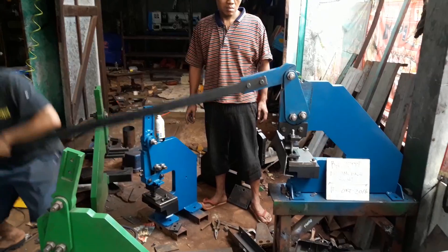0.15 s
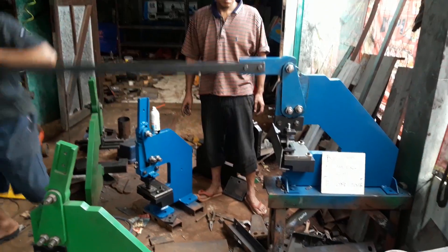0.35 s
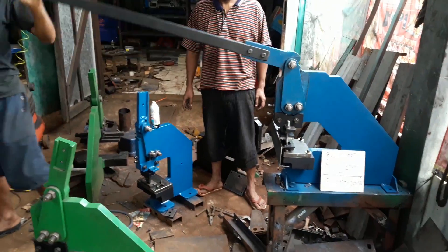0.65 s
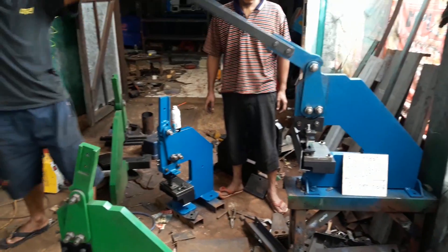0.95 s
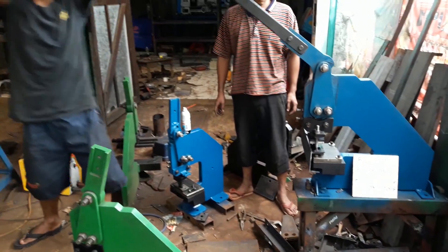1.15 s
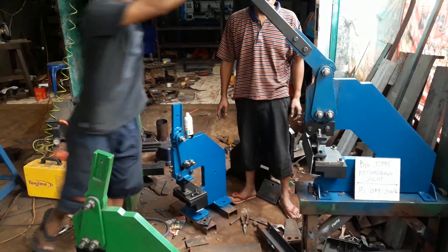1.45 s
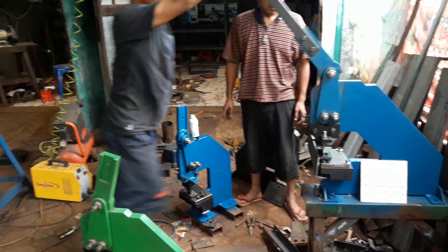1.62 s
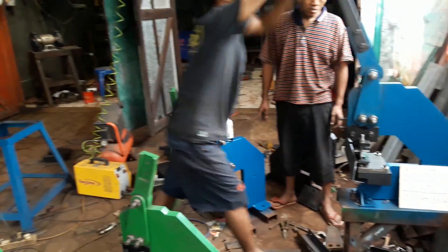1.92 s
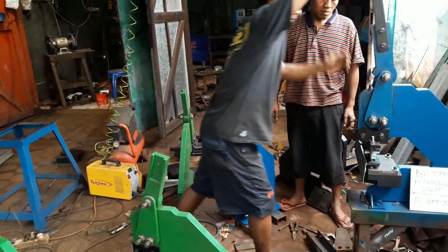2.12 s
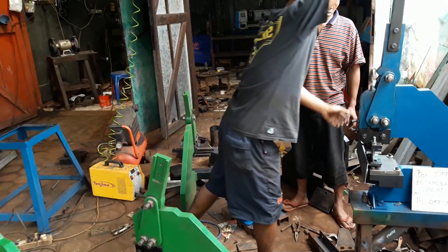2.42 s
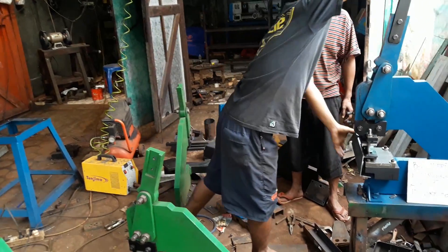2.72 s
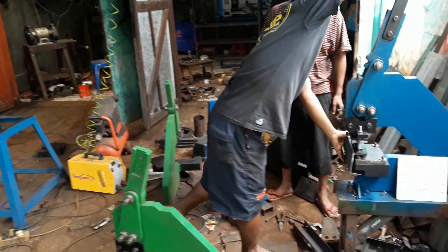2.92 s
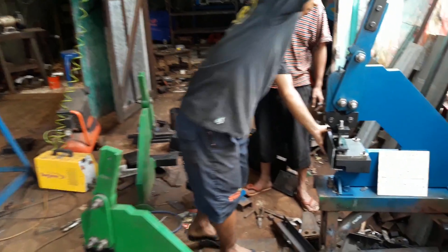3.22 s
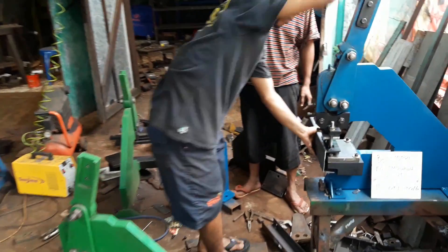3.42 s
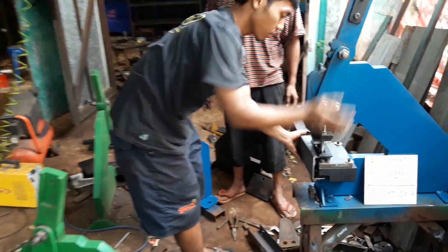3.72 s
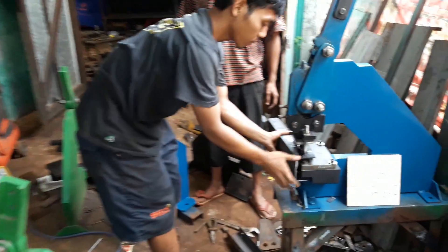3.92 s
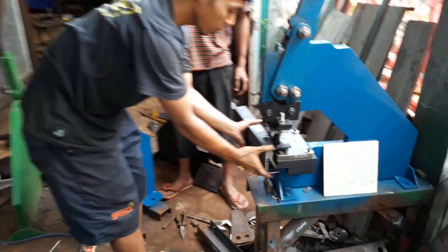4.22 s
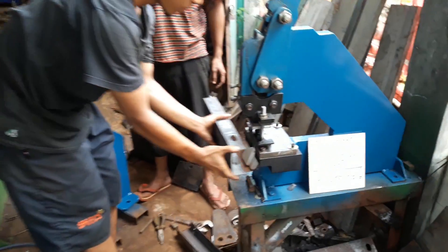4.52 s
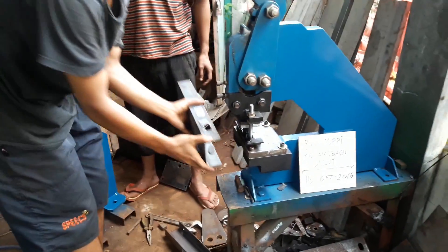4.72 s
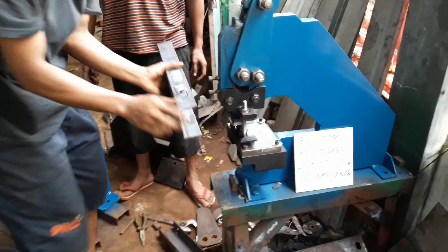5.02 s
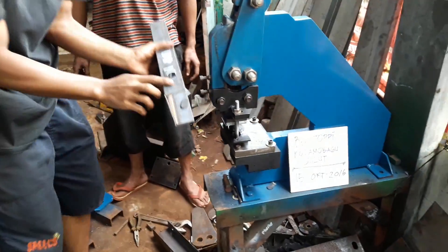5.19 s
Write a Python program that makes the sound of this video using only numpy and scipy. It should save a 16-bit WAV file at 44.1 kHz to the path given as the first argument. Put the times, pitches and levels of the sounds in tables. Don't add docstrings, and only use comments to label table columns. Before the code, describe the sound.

Close to the microphone in an open workshop, a punch press breaks through steel with a very loud, bright bang that rings for about a second. The lever clanks and bounces on its stop, its pin rattling. Sandals scuff grit and cloth rubs, with dull bumps. Later a steel bar rattles and slams free of the die. Small birds peep falling calls over low street rumble.

```python
import sys
import numpy as np
from scipy import signal
from scipy.fft import rfft, irfft
from scipy.io import wavfile
from scipy.ndimage import uniform_filter1d

SR = 44100
rng = np.random.default_rng(int(sys.argv[2]) if len(sys.argv) > 2 else 0)


def level_to_linear(level):
    exponent = np.asarray(level, float) / 20
    return 10 ** exponent


def digitize_waveform(pressure):
    field = np.atleast_2d(pressure).T
    bounded = np.clip(field, -1, 1)
    quanta = np.round(bounded * 32767).astype(np.int16)
    wavfile.write(sys.argv[1], SR, quanta)


N = 235960

# start in seconds, peak in dB.
PUNCH = [
    (.0556, -26),
    (.0603, -7),
    (.222, -35),
]
CASTING_HZ = [581, 722, 820, 1048, 1244, 1550, 1852, 2085, 2250, 2411, 2530, 2827, 2912, 3010, 3124, 3270,
              3417, 3598, 3795, 3973, 4150, 4357, 5130, 5475, 6464, 6524, 6867, 7209, 7530, 7768, 8839,
              9162, 10060, 10860, 11650, 13180, 15020]
# level in dB, t60 in seconds, rise in seconds, beats per second,
# split neighbour in dB.
CASTING = [(-27, 0.6, 0.095, 2.2, -3.5), (-24, 0.35, 0.057, 5.2, -6), (-33.5, .2, .02, 25, -4.5),
           (-33.5, 0.55, 0.002, 14, -6), (-40, 0.18, 0.0013, 16, 7), (-37.5, 1, 0.015, 12, 3),
           (-33.5, 0.9, .002, 7.7, -7.5), (-35, 1, 0.0022, 18, -3.5), (-31.5, 0.25, 0.0022, 12, -15),
           (-16, 0.27, 0.0021, 2.6, -9.5), (-43.5, 0.28, .002, 13, -12.5), (-12.5, 0.42, 0.027, 4.4, -23),
           (-23, 0.62, 0.0039, 38, -12), (-16, 0.4, 0.023, 11.2, -2), (-19, 0.57, 0.0018, 6.2, -8),
           (-27, .3, .002, 27, -9.5), (-19.5, 0.41, .004, 7.9, -1.5), (-24.5, 0.72, 0.0048, 5, -2.5),
           (-29, 0.87, .03, 9, -17.5), (-22, 0.65, 0.06, 7.8, -13.5), (-23.5, 0.116, 0.0019, 9, -14.5),
           (-33.5, 0.24, .004, 9, -21), (-43, 0.2, 0.012, 4, -24), (-9.5, 0.45, 0.06, 1.2, -2.5),
           (-19, 0.52, 0.0022, 51, 0), (-8.5, 0.28, 0.069, 11.8, -0.5), (-26, 0.42, 0.027, 9, -19.5),
           (-19.5, 0.34, 0.017, 4, -17), (-11.5, 0.26, 0.04, 25, 2), (-29.5, 0.45, 0.0081, 7, -12),
           (-31.5, 0.27, .01, 7, -12), (-35.5, 0.4, .02, 9, -11.5), (-28.5, 0.24, .003, 11, -6.5),
           (-28, 0.27, 0.0042, 9, 5), (-31, .22, .005, 25, -7.5), (-26.5, .25, 0.012, 19, -9.5),
           (-23.5, .22, .012, 33, -15)]
# mode in Hz, level in dB, t60 in seconds.
SHEEN = [(8495, -8, .23), (9750, -12.5, .2), (8900, -6, .21), (9360, -16.5, .14), (9580, -14, 0.28),
         (10000, -10.5, .2), (10860, -4.5, 0.35), (11420, -3.5, 0.095), (12130, -9, .18), (12700, -9.5, .2),
         (13370, -1, .25), (14080, -11, .25), (14500, -8, .15), (15700, 0, .15)]
# frequency in Hz, level in dB per Hz.
CRACK = [(300, -64.5), (600, -14), (1500, -17.5), (2200, -6.5), (3300, -0.5), (4500, -7.5), (7000, -6),
         (8200, -13.5), (13000, -16.5), (16500, -14.5)]
# frequency in Hz, level in dB per Hz.
HAZE_TOP = [(12000, -24)]
# frequency in Hz, level in dB per Hz.
CLANK = [(70, -62), (250, -8), (400, 4.5), (1200, 2), (2000, -2), (3300, -2), (5000, -20), (7600, -46),
         (8400, -20), (15000, -66)]
# start in seconds, peak in dB.
BUMPS = [(2.957, -33), (3.447, -33), (3.468, -38.5), (4.795, -50), (4.822, -43)]

# start in seconds, peak in dB, brightness in dB per octave.
LEVER_KNOCKS = [
    (1.209, -37.5, 5.5),
    (1.2545, -16.5, -2.5),
    (1.2615, -20, -3.5),
    (1.275, -25, -1),
]
# mode in Hz, level in dB, t60 in seconds.
LEVER = [(369, -11, 0.083), (476, 0, 0.038), (572, -8, 0.072), (987, -3.5, 0.13), (1157, -3.5, 0.13),
         (1400, -4, 0.11), (1550, -5.5, 0.17), (1792, -6, 0.16), (2250, -4, 0.073), (2465, 2, 0.071),
         (2710, -2.5, 0.1), (2880, -6, 0.2), (3090, -2.5, 0.25), (3503, -6, 0.25), (3740, -1, 0.18),
         (4336, 0.5, 0.07), (4830, -16, .15), (7400, -16, 0.13)]
# start in seconds, peak in dB, brightness in dB per octave.
PIN_KNOCKS = [(1.311, -21, 1.5), (1.328, -26.5, -4), (1.419, -29, -1.5), (1.49, -38.5, -3.5)]
# mode in Hz, level in dB, t60 in seconds.
PIN = [(472, -9.5, 0.14), (607, -9.5, 0.17), (1023, -11, .12), (1160, -25, 0.061), (1437, -3, 0.12),
       (1543, -1, 0.13), (1806, -17, .15), (2470, -3.5, 0.14), (2940, -9.5, 0.51), (2990, -23, 0.37),
       (3000, -21, .15), (3400, -5, 0.24), (3510, -5, 0.26), (4130, -11.5, 0.27), (4250, -14, 0.13),
       (4430, -12, 0.1), (4740, -20, 0.46), (5900, -23, 0.28), (7133, -21, 0.25), (7600, -20, .15)]

# start in seconds, peak in dB.
NUDGES = [(3.543, -51), (3.573, -38), (3.592, -41), (3.603, -49), (3.6166, -34), (3.634, -32.5),
          (3.648, -37), (3.672, -50), (3.757, -54.5), (3.79, -42.5)]
# mode in Hz, level in dB, t60 in seconds.
HELD_BAR = [(960, -7, 0.09), (1538, -4, 0.18), (2003, -6, 0.14), (2330, -15, 0.13), (2600, -17, 0.17),
            (3030, -8.5, 0.13), (3360, -20, .1), (3930, -19, 0.13), (4420, -23, 0.2), (4540, -17.5, 0.12),
            (5900, -24, 0.18), (6530, -18, 0.13), (7560, -23, 0.099), (8800, -31, .15)]
# start in seconds, peak in dB, brightness in dB per octave.
RATTLE = [(4.2103, -42, -4), (4.2173, -35.5, 3), (4.2302, -42, -9), (4.2352, -32.5, 1.5),
          (4.2407, -32.5, -1), (4.2726, -29.5, 1), (4.2776, -32.5, 7.5), (4.293, -27.5, 1),
          (4.316, -36, -6), (4.3205, -22, -0.5), (4.347, -22.5, 3.5), (4.389, -42, -7)]
# mode in Hz, level in dB, t60 in seconds.
FREE_BAR = [(981, -6.5, 0.18), (1532, -4, 0.42), (1914, -9, 0.34), (2306, -18, 0.18), (2605, -19, 0.51),
            (2830, -19.5, 0.85), (2990, -20, 0.86), (3390, -17.5, 0.24), (3980, -15, 0.15),
            (4400, -22, 0.16), (4600, -21.5, 0.27), (4900, -39, .3), (5620, -34, .1), (5800, -30, 0.32),
            (6550, -32, 0.15), (6800, -39, 0.33), (7160, -31, 0.3), (8400, -41, 0.24), (9930, -46, 0.2),
            (11420, -42, 0.23), (12390, -48, 0.2)]

# start in seconds, peak in dB, centre in Hz.
THUDS = [(.035, -43, 260), (.222, -35, 192), (1.095, -42.5, 494), (2.89, -41, 359), (2.957, -27, 435),
         (3.15, -37, 354), (3.447, -38.5, 400), (.55, -37.5, 484), (2.03, -31.5, 990), (3.62, -38, 556)]
# start in seconds, peak in dB, pitch in Hz.
TINKS = [(2.497, -60, 2850), (3.147, -54, 4600), (3.643, -53, 6530), (3.787, -59.5, 4350),
         (4.272, -51, 5600)]
# start in seconds, peak in dB, centre in Hz.
SNAPS = [(3.731, -56, 10430), (4.795, -38, 1900), (4.822, -34, 2270), (4.85, -37, 2340),
         (4.872, -29.5, 2300)]
TICKS = [.264, 2.814, 2.974, 3.036, 3.095, 3.155, 3.296, 3.395, 3.535, 3.854, 3.915, 3.975, 4.135, 4.435]
# start in seconds, peak in dB, brightness in dB per octave.
CREAKS = [(.566, -50.5, 9.5), (.575, -46, 2), (.698, -54, 5), (.755, -41, 1.5), (3.92, -48, -1.5),
          (2.66, -59, -8)]
# mode in Hz, level in dB, t60 in seconds.
CASE = [(289, -5.5, 0.033), (3450, 10, 0.0016), (5640, -4.5, 0.0061), (7480, -1.5, 0.0043),
        (12600, -9, 0.0045), (15800, -15, 0.0052)]

# peak time in seconds, swell in seconds, fade in seconds, grit in dB, dull drag
# over grit in dB.
SCUFFS = [(.6, 0.18, 0.4, -56.5, -6.5), (1.27, 0.028, 0.061, -45, 8.5), (1.335, 0.047, 0.2, -53.5, 5.5),
          (1.68, 0.092, 0.15, -58.5, -3), (2.011, 0.033, 0.071, -41.5, -5), (2.2, 0.19, 0.45, -69.5, -4.5),
          (2.8, 0.083, 0.4, -66.5, -24.5), (3.12, 0.19, 0.18, -79, 21.5), (3.441, 0.12, 0.24, -66, -16),
          (3.635, 0.067, 0.087, -64.5, 13.5), (4.34, 0.1, 0.11, -57, -5), (4.74, 0.02, 0.034, -61, -16),
          (4.852, 0.033, 0.0434, -36, -3.5), (4.94, 0.028, 0.061, -51.5, -4.5), (5.35, 0.054, .1, -63, -20)]
# peak time in seconds, swell in seconds, fade in seconds, level in dB.
RUSTLES = [(.63, 0.084, 0.085, -60), (1.015, 0.033, 0.026, -65), (1.25, 0.051, 0.026, -63),
           (1.33, 0.028, 0.081, -64.5), (1.67, 0.066, 0.11, -60.5), (2.012, 0.032, 0.041, -48),
           (2.25, 0.24, 0.33, -77.5), (2.85, 0.13, 0.13, -74.5), (3.44, 0.23, 0.061, -67.5),
           (3.62, 0.095, 0.11, -69), (4.33, 0.15, 0.093, -66.5), (4.74, 0.018, 0.044, -67),
           (4.854, .035, 0.055, -59.5), (4.94, .03, 0.045, -63), (5.35, 0.034, .1, -74.5)]
# cloth, grit and drag in dB.
STIR_DB = (-78.5, -75.5, -61.5)
# frequency in Hz, level in dB per Hz.
CLOTH = [(6500, -34), (8300, -3), (9700, -0.5), (13000, -3.5), (15800, -6.5)]
GRIT = [(1500, -11.5), (3000, 0), (4300, 0), (7500, 0), (8300, -17)]
DRAG = [(90, -58.5), (280, -25.5), (600, 3.5), (1000, 9), (2000, 9), (3200, 0), (6000, -33)]

# start in seconds, sag in seconds, drop in seconds, pitch before the break in Hz,
# level in dB.
PEEPS = [(0.5, 0.15, 0.12, 3750, -60.5), (1.001, 0.12, 0.082, 3540, -60), (1.593, 0.13, 0.074, 3480, -59.5),
         (2.123, 0.068, 0.073, 3515, -56), (2.59, 0.093, 0.083, 3530, -57),
         (3.031, 0.13, 0.073, 3530, -58.5), (3.518, .097, .078, 3670, -51.5),
         (3.965, 0.12, 0.068, 3650, -56.5), (4.496, 0.14, 0.071, 3740, -58.5),
         (4.986, 0.13, 0.037, 3600, -61)]
# note in dB, octave in dB.
PEEP_DROPS = [(7, 6), (8, 9), (8, 5), (3, 10), (3, 4), (4.5, 5), (2.5, 1), (7, -2), (6, -7), (2, -15)]
# start in seconds, hold in seconds, plunge in seconds, pitch at the end of the hold
# in Hz, level in dB.
CHEEPS = [(3.882, 0.037, 0.0089, 3630, -59.5), (3.933, 0.23, 0.087, 3173, -56.5),
          (4.324, 0.033, 0.071, 3860, -49), (4.895, 0.0562, 0.0133, 3760, -50),
          (4.976, 0.1, 0.02, 3270, -52.5)]
# time in seconds,
# pitch in Hz, level in dB.
FULL_CHEEPS = [
    [(.29, 3400, -53), (.322, 3225, -39.5), (.345, 2960, -40.5), (.352, 2520, -44.5), (.368, 2250, -46)],
    [(.645, 4400, -61), (.663, 4605, -49.5), (.793, 4430, -49), (.823, 4290, -51), (.829, 4011, -37),
     (.842, 3970, -42.5), (.87, 3730, -45), (.878, 3500, -42)],
    [(.878, 2990, -48), (.89, 2830, -54), (.908, 2375, -53)],
    [(1.155, 4420, -55), (1.19, 4180, -53), (1.225, 4030, -47), (1.255, 3930, -48), (1.3, 3300, -49)],
    [(1.69, 4090, -55), (1.71, 4180, -56), (1.76, 4070, -50), (1.8, 4010, -39), (1.826, 3850, -43),
     (1.838, 3530, -42), (1.88, 3050, -41.5), (1.892, 2820, -48.5), (1.908, 2130, -41)],
    [(2.655, 3920, -54), (2.696, 3850, -52), (2.73, 3730, -49.5), (2.745, 3500, -54), (2.76, 3160, -48),
     (2.776, 3045, -47), (2.8, 2690, -57)],
    [(4.0, 6480, -71.5), (4.05, 6600, -76), (4.125, 6500, -75), (4.18, 6000, -69)],
    [(5.23, 3940, -66), (5.246, 4090, -56.5), (5.29, 4090, -52.5), (5.322, 3832, -52), (5.33, 3450, -48),
     (5.349, 3350, -55)],
]
# pitch in Hz, octave over the note in dB.
OCTAVE = [(2450, -6.5), (2900, -18.5), (3250, -23), (3700, -29), (4200, -53)]
# time in seconds, pitch in Hz, level in dB.
HORN = [
    [(2.27, 820.4, -65), (2.32, 806, -56), (2.38, 794.8, -65)],
    [(4.7, 850, -73), (4.708, 834.4, -55), (4.852, 884, -48.5), (4.96, 840, -57)],
]
# frequency in Hz, level in dB per Hz.
STREET = [(15, -35), (25, -59.5), (43, -4.5), (137, 3), (557, -10.5), (1150, -11.5), (1680, -13.5),
          (2390, -24), (3880, -21.5), (4950, -28.5), (6140, -34), (7420, -26.5), (8490, -48),
          (13100, -34.5), (15800, -36.5)]
# time in seconds, level in dB.
STREET_SWELL = [(0, 7), (0.998, 0), (2.2, 1.4), (2.55, -2), (2.85, -0.4), (3.4, 1.4), (4.0, 0.6),
                (4.75, 1.5), (5.35, 1.5)]
# frequency in Hz, t60 in seconds.
SHOP_T60 = [(300, 0.4), (3000, 0.47), (14000, 0.34)]


def casting(s):
    t, out = np.arange(SR) / SR, np.zeros(N)
    starts = rng.uniform(0, 2 * np.pi, len(CASTING))
    for hz, (level_db, t60, rise, beats, twin_db), start in zip(CASTING_HZ, CASTING, starts):
        mode = np.sin(2 * np.pi * hz * t + start)
        twin = level_to_linear(min(twin_db, 0)) * np.sin(2 * np.pi * (hz + beats) * t + start)
        decay = level_to_linear(level_db - 60 * t / min(t60, .75) - 56.5 * t ** 2)
        out[int(s * SR):][:SR] += decay * (1 - np.exp(-t / rise)) * (mode + twin)
    return out


def ringing_press():
    return casting(PUNCH[1][0]) + struck(PUNCH[1:2], SHEEN, -24.0, 0, .35)


def cracking_steel():
    tear = burst(PUNCH[:1], CRACK, -0.5, 0.055)
    snap = burst(PUNCH[1:2], CRACK, -10.5, 0.044)
    haze = burst(PUNCH[1:2], CRACK[:8] + HAZE_TOP, -12, 0.24)
    slug = burst(PUNCH[2:], CLANK, 0, 0.21)
    bumps = burst(BUMPS, CLANK, -14, 0.099)
    return tear + snap + haze + slug + bumps


def clanking_lever():
    out = struck(LEVER_KNOCKS, LEVER, -10.0, 2.2, 0.19)
    out += struck(PIN_KNOCKS, PIN, -9.5, 1.4, 0.5)
    out += burst(LEVER_KNOCKS + PIN_KNOCKS, CLANK, -16.0, 0.13)
    return out * level_to_linear(3.0 * drift(99))


def loose_bar():
    drag = struck(RATTLE[:8], FREE_BAR, -4.5, 2.0, .6)
    drag *= level_to_linear(-14 * ramp(4.318, .004))
    slam = struck(RATTLE[9:10], FREE_BAR, -4, 0, 0.84)
    bounces = struck(RATTLE[10:], FREE_BAR[3:], -5.5, 2.0, 0.82)
    return drag + slam + bounces


def rattling_bar():
    out = loose_bar() + struck(NUDGES, HELD_BAR, -5, 4, 0.12)
    out += burst(RATTLE + NUDGES, CLANK, -15.5, 0.054)
    fingers_db = -13 * ramp(4.425, 0.03)
    return out * level_to_linear(1.24 * drift(69) + fingers_db)


def near_handling():
    ticks = pops([(s, -50, 13000) for s in TICKS], 3.47, 0)
    tap = struck([(1.7194, -19)], CASE, 0, 0, .05, 0)
    creaks = struck(CREAKS, CASE[1:], 0, 3, .05, 0)
    return pops(SNAPS, 25.2, 0) + ticks + tap + creaks


def thuds_and_tinks():
    return pops(THUDS, 16.6, 0) + pops(TINKS, 250, 0)


def scuffs():
    *when, grit_db, weight_db = np.transpose(SCUFFS)
    cloth = strokes(*np.transpose(RUSTLES))
    gains = cloth, strokes(*when, grit_db), strokes(*when, grit_db + weight_db)
    shared, out = drift(120), 0
    for gain, stir_db, colour in zip(gains, STIR_DB, (CLOTH, GRIT, DRAG)):
        grains = rng.standard_normal(N) * level_to_linear(1.6 * shared)
        out = out + (gain + level_to_linear(stir_db)) * coloured(grains, colour)
    return out


def strokes(s, swell_s, fade_s, peak_db):
    t = np.arange(0, N + 64, 64) / SR - s[:, None]
    away = np.abs(t) / np.where(t < 0, swell_s[:, None], fade_s[:, None])
    gain = level_to_linear(peak_db[:, None] - 11.5 * away ** 1.5).sum(axis=0)
    return np.interp(np.arange(N) / 64, np.arange(len(gain)), gain)


def peep(s, sag_s, drop_s, knee_hz, level_db, note_db, octave_db):
    top_hz, break_s = 4300, 0.015
    shelf_s = max(0.68 * drop_s, break_s + .001)
    steps = [0, .2 * sag_s, sag_s, sag_s + break_s, sag_s + shelf_s, sag_s + drop_s]
    hz = [top_hz, top_hz - .35 * (top_hz - knee_hz), knee_hz, 3100, 2850, 2417]
    shape_db = np.array([-8, 0, 0, -11, note_db, note_db - 4])
    shut_db = -18 * (np.arange(6) < 4)
    return with_octave(s + np.array(steps), hz, level_db + shape_db, octave_db + shut_db)


def cheep(s, hold_s, plunge_s, knee_hz, level_db):
    dive_s, attack_s = .08, .012
    after = np.array([-hold_s, min(attack_s - hold_s, -hold_s / 2), 0, min(dive_s, 1.3 * plunge_s), plunge_s])
    fall_hz_per_s = np.where(after < 0, .06 * knee_hz / hold_s, 12000)
    hz = knee_hz - fall_hz_per_s * after
    hz -= 36000 * np.maximum(after - dive_s, 0)
    shape_db = np.array([-12, -6, 0, -1, -10])
    return with_octave(s + hold_s + after, hz, level_db + shape_db, -5)


def with_octave(s, hz, level_db, octave_db=0):
    return np.transpose([s, hz, level_db, level_db + octave_db + at_hz(OCTAVE, hz)])


def two_birds():
    first = whistle([peep(*call, *drop) for call, drop in zip(PEEPS, PEEP_DROPS)], 3.2, wobble=.007)
    second = whistle([cheep(*call) for call in CHEEPS], 3.5, wobble=.007)
    full = whistle([with_octave(*np.transpose(call), -5) for call in FULL_CHEEPS], 2, wobble=.005)
    return first + second + full


def far_horn():
    return whistle(HORN, 2.9, wobble=0.0034)


def street():
    noise = coloured(rng.standard_normal(N), STREET)
    low = signal.sosfilt(signal.butter(2, 300, fs=SR, output="sos"), noise)
    swell_db = np.interp(np.arange(N) / SR, *np.transpose(STREET_SWELL))
    return level_to_linear(-50.5 + swell_db) * (noise + low * (level_to_linear(0.5 * drift(6.0)) - 1))


def workshop(x):
    t, echoes = np.arange(SR) / SR, 0
    edges = np.geomspace(100, 17000, 8)
    for low, high in zip(edges, edges[1:]):
        band_pass = signal.butter(2, [low, high], "band", fs=SR, output="sos")
        band = signal.sosfilt(band_pass, rng.standard_normal(SR))
        echoes = echoes + band * level_to_linear(-60 * t / at_hz(SHOP_T60, np.sqrt(low * high)))
    echoes = echoes * np.clip(t / 0.0056, 0, 1)
    return signal.fftconvolve(x, echoes / np.sqrt(np.sum(echoes ** 2)))[:N]


def struck(hits, modes, trim_db, scatter_db, longest, contact_s=.004):
    hits, out = np.array(hits), np.zeros(N)
    at = (hits[:, 0] * SR).astype(int)
    first, last = at.min(), min(at.max() + SR, N)
    luck = rng.standard_normal((len(hits), len(modes)))
    late = (rng.random(luck.shape) ** 2 * contact_s * SR).astype(int)
    bright = hits[:, 2] if hits.shape[1] > 2 else 0
    for k, (hz, level_db, t60) in enumerate(modes):
        clicks = np.zeros(last - first)
        tilt_db = bright * np.log2(hz / 2000)
        blow_db = hits[:, 1] + level_db + trim_db + tilt_db + scatter_db * luck[:, k]
        clicks[at - first + late[:, k]] = (-1) ** k * level_to_linear(blow_db)
        soft = np.exp(-2 * np.pi * 2 * hz / SR)
        contact = signal.lfilter([(1 - soft) ** 2], [1, -2 * soft, soft ** 2], clicks)
        twin = ring(contact, hz * (1 + 0.0047 * np.cos(2 * k)), min(t60, longest))
        out[first:last] += ring(contact, hz, min(t60, longest)) + level_to_linear(-18) * twin
    return out


def ring(clicks, hz, t60):
    r, w = level_to_linear(-60 / (t60 * SR)), 2 * np.pi * hz / SR
    return signal.lfilter([0, np.sin(w)], [1, -2 * r * np.cos(w), r * r], clicks + 1e-18)


def burst(hits, spectrum, trim_db, t60):
    clicks = np.zeros(N)
    clicks[[int(h[0] * SR) for h in hits]] = [level_to_linear(h[1] + trim_db) for h in hits]
    glow = signal.lfilter([1], [1, -level_to_linear(-60 / (t60 * SR))], clicks + 1e-18)
    return glow * coloured(rng.standard_normal(N), spectrum)


def pops(events, turns, trim_db):
    out, contact = np.zeros(N), rng.standard_normal((len(events), 24))
    for (s, peak_db, hz), grain in zip(events, contact):
        at = int(s * SR)
        kick = np.r_[1, .3 * np.diff(grain), np.zeros(4000)]
        out[at:at + len(kick)] += level_to_linear(peak_db + trim_db) * ring(kick, hz, turns / hz)
    return out


def whistle(calls, rough_db, wobble):
    t, out = np.arange(N) / SR, np.zeros(N)
    flutter = level_to_linear(rough_db * (0.86 * drift(81) + 0.77 * drift(41)))
    waver = 1 + wobble * drift(160)
    for rows in calls:
        s, hz, *partials_db = np.transpose(rows)
        on = (t >= s[0]) & (t < s[-1])
        edge = np.clip(np.minimum(t[on] - s[0], s[-1] - t[on]) / 0.00046, 0, 1)
        phase = 2 * np.pi * np.cumsum(np.interp(t[on], s, hz) * waver[on]) / SR
        for k, level_db in enumerate(partials_db):
            level = np.sqrt(2) * edge * level_to_linear(np.interp(t[on], s, level_db))
            out[on] += level * np.sin((k + 1) * phase)
    return out * flutter


def ramp(start_s, takes_s):
    return np.clip((np.arange(N) / SR - start_s) / takes_s, 0, 1)


def rms_one(x):
    return x / np.sqrt(np.mean(x ** 2) + 1e-20)


def at_hz(points, hz):
    table_hz, values = np.transpose(points)
    return np.interp(np.log(hz), np.log(table_hz), values)


def coloured(x, spectrum):
    hz = np.maximum(np.arange(len(x) // 2 + 1) * SR / len(x), 1)
    return rms_one(irfft(rfft(x) * level_to_linear(at_hz(spectrum, hz)), len(x)))


def drift(rate):
    r = np.exp(-80 * np.pi * rate / SR)
    slow = signal.lfilter([1], [1, -2 * r, r * r], rng.standard_normal(N // 40 + 2002))[2000:]
    return np.interp(np.arange(N) / 40, np.arange(len(slow)), rms_one(slow))


def scene():
    ringing, crack = ringing_press(), cracking_steel()
    lever, bar = clanking_lever(), rattling_bar()
    near, thuds = near_handling(), thuds_and_tinks()
    birds, horn = two_birds(), far_horn()
    wet = level_to_linear(-10) * ringing + level_to_linear(-4) * crack + level_to_linear(-6) * (lever + bar)
    wet += level_to_linear(-21) * near + level_to_linear(-1.5) * thuds + level_to_linear(-4) * birds
    direct = ringing + crack + lever + bar + near + thuds + birds + horn
    return (direct + workshop(wet) + scuffs() + street())[None]


def sudden_top(x):
    low = irfft(rfft(x) * (np.arange(N // 2 + 1) * SR / N < 15870), N)
    power = uniform_filter1d((x - low) ** 2, size=256)
    leaps = (power > 30 * np.roll(power, 700, axis=-1)) & (power > 1e-7)
    return low + (x - low) * np.clip(4 * uniform_filter1d(leaps * 1., size=400), 0, 1)


def band_limit(x):
    return signal.sosfilt(signal.butter(12, 17150, fs=SR, output="sos"), x)


def record(dry):
    limited = .95 * np.tanh(dry / .95)
    cut = signal.sosfilt(signal.cheby2(12, 70, 17300, fs=SR, output="sos"), limited)
    cut = signal.sosfilt(signal.butter(3, 50, "high", fs=SR, output="sos"), cut)
    return band_limit(sudden_top(cut))


dry = scene()
out = record(dry)
digitize_waveform(out)
```